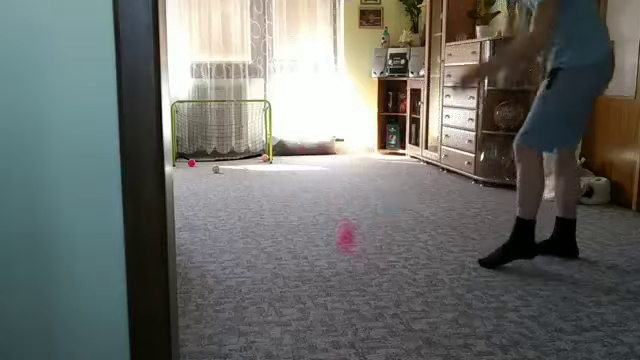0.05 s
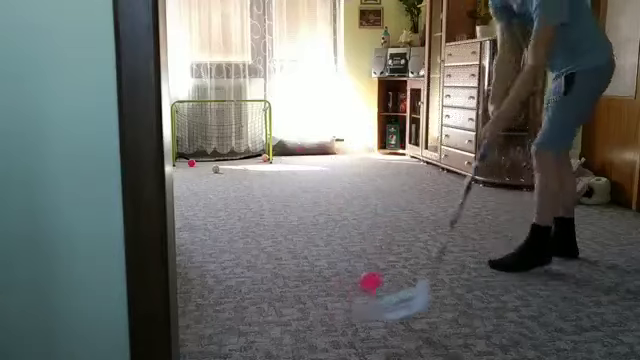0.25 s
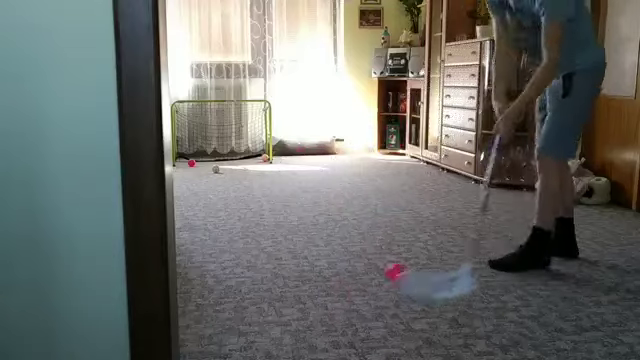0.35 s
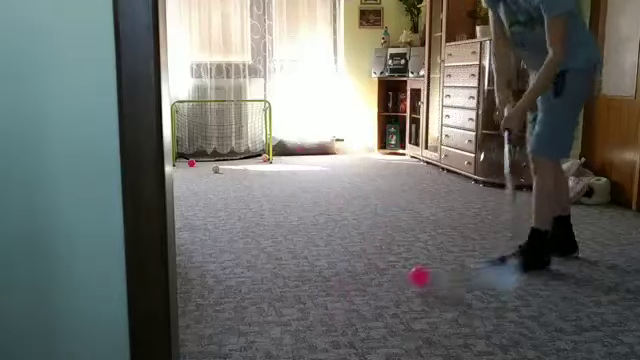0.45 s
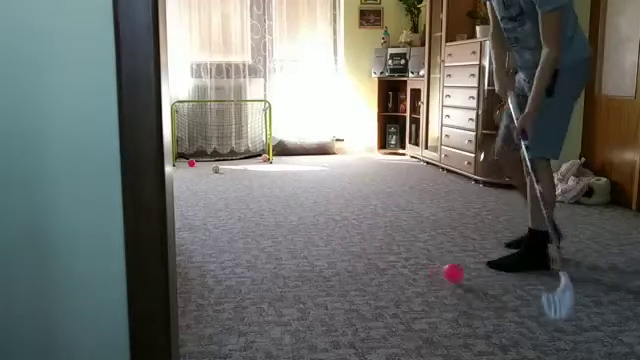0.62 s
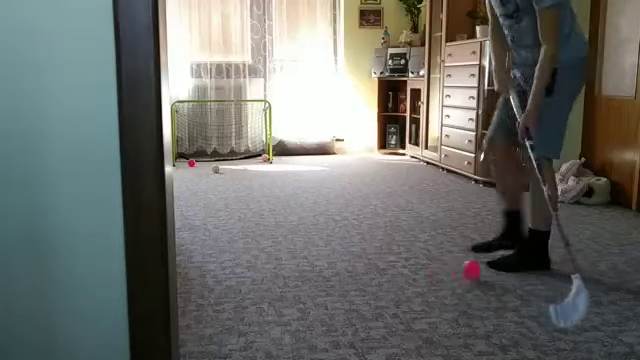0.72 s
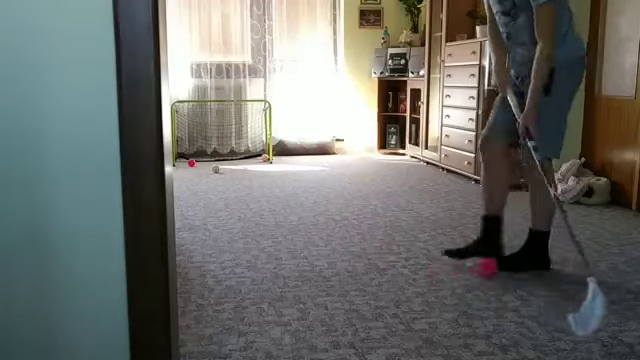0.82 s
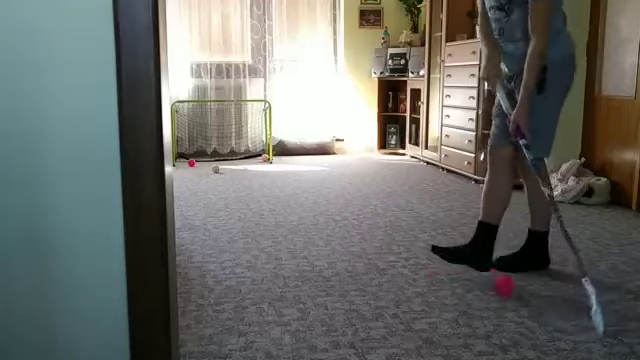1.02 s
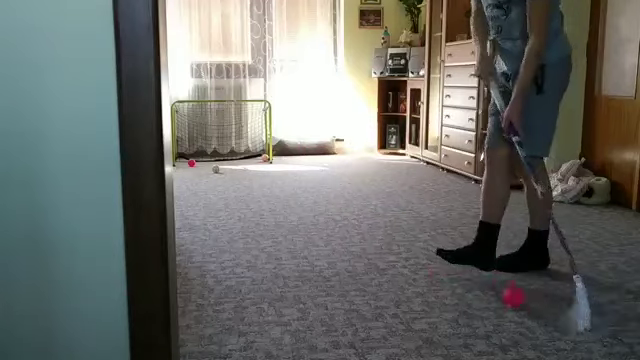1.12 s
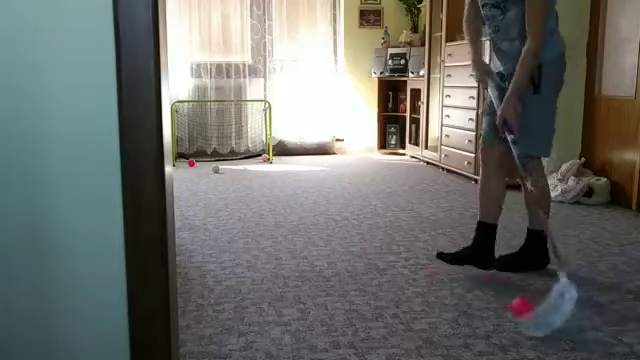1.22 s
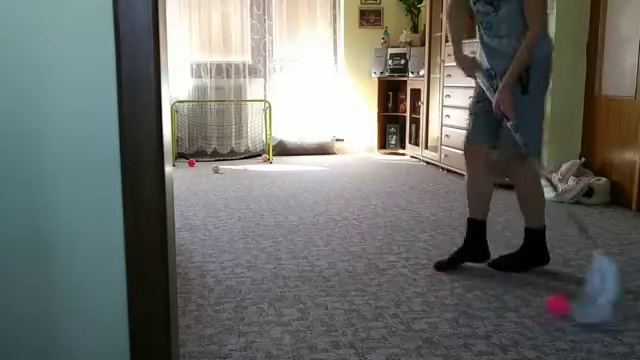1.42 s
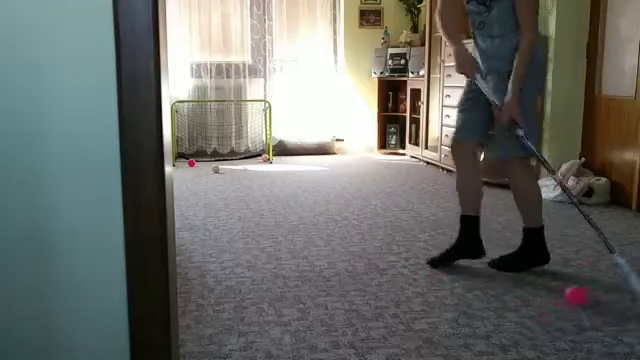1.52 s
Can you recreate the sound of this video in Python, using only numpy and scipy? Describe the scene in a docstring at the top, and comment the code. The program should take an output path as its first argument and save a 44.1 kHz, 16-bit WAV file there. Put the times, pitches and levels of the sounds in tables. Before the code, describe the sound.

One sharp stick hit on a plastic ball, then a lighter tap, in a quiet room.

```python
"""A quiet carpeted living room, with a floorball stick a few metres from the microphone.
The blade thuds on the carpet and cracks against the hollow plastic ball; later it taps the ball again.
Each blow is a click, a buzz, a short plastic ring and the note of the air inside the ball.
Around the blows the blade brushes the carpet and socked feet step softly, over a faint hiss."""
import sys
import numpy as np
from scipy import signal
from scipy.fft import rfft, irfft
from scipy.io import wavfile
from scipy.ndimage import uniform_filter1d

SR = 44100
rng = np.random.default_rng(int(sys.argv[2]) if len(sys.argv) > 2 else 0)


def store_wav(level_fs):
    """Save 16-bit WAV to argv[1]."""
    pcm = np.round(np.clip(np.atleast_2d(level_fs), -1, 1) * 32767)
    wavfile.write(sys.argv[1], SR, pcm.T.astype(np.int16))


N = 68355

# blade on ball, hard then light (time [s], click [dB], buzz [dB], shell [dB], echo hold [s], direct [dB])
BALL_HITS = [(.2612, 14.5, -1, 3, 0.024, -13.5), (1.3942, -4, -11, -8.5, 0.0018, -18.5)]
# EQ of the contact click (frequency [Hz], hard blow [dB], light blow [dB])
CLICK_EQ = [(29.6, -10, -24), (122, -31, -12), (236, -8, 0.5), (444, -0.5, -3.5), (1090, -7, 3),
            (1760, -5.5, -5), (3200, -3.5, -1.5), (3680, -2, -4), (5400, 2, -3.5), (8500, 3, 3),
            (11200, -4, -5.5), (13900, -10, -9), (16100, -13.5, -20)]
# ring of plastic shell and blade (frequency [Hz], hard blow [dB], light blow [dB], t60 [s])
SHELL_MODES = [(2430, -9, 3, .014), (3200, -2, -14, .05), (3530, -7, -8, .07), (4000, -6, -6, .05),
               (4340, 2, -9, .035), (4640, -6, -12, .05), (5520, 1, -16, .015), (5790, 1, -14, .018),
               (6000, 0, -9, .02), (6720, -7, -11, .035), (7600, -3, 0, .02), (8480, 1, -1, .016),
               (8950, -2, -3, .02), (9610, -2, 3, .018), (10850, -5, -14, .02), (11880, -8, -16, .06)]
# notches between the resonances (frequency [Hz], width [Hz], hard blow [dB], light blow [dB])
SHELL_NOTCHES = [(2750, 110, -8, 0), (3030, 130, -10, -2), (3400, 90, -5, 0), (3900, 100, -7, 0),
                 (4980, 170, -5, 0), (5280, 200, 0, -6), (6420, 260, -7, 0), (7000, 320, -6, -1),
                 (10400, 300, -3, -2), (12250, 240, -6, -1)]
# air note of the hollow ball, hard then light (pitch [Hz], level [dB])
AIR_NOTES = [(1128, -9), (1050, -15.5)]


def ball_blows():
    """A hard and a light blow: the blade clicks and buzzes on the ball; its shell and the air in it ring."""
    out, eqs, notches = np.zeros((2, N)), np.array(CLICK_EQ), np.array(SHELL_NOTCHES)
    buzz = blade_bending(unit(ring(hz=8200, t60=.002)))
    for k, (start, click_db, buzz_db, shell_db, hold_s, direct_db) in enumerate(BALL_HITS):
        contact = undb(click_db) * click(eqs[:, [0, k + 1]])
        shell = unit(sum(undb(mode[k + 1]) * ring(mode[0], mode[-1]) for mode in SHELL_MODES))
        clack = hollow(contact + undb(shell_db) * shell, notches[:, [0, 1, k + 2]])
        note_hz, note_db = AIR_NOTES[k]
        note = undb(note_db) * unit(ring(note_hz, t60=.13, size=8192))
        add(out, start, heard(blade_bending(clack), room(direct_db, pan_db=5, hold_s=hold_s)))
        add(out, start, heard(undb(buzz_db) * buzz, room(direct_db=-2, pan_db=5, hold_s=hold_s)))
        add(out, start, heard(note, room(direct_db=5, pan_db=-1)))
    return out


def blade_bending(sound, travel_s=.0006, at_hz=8000):
    """Bending waves cross the blade treble first and smear a click into a short crack."""
    hz = np.fft.rfftfreq(len(sound), 1 / SR)
    cycles = 2 * travel_s * np.sqrt(hz * at_hz)
    return irfft(rfft(sound) * np.exp(-2j * np.pi * cycles))


def hollow(sound, notches):
    """Narrow notches between the resonances make a blow sound hollow."""
    hz = np.fft.rfftfreq(len(sound), 1 / SR)
    cuts = [1 + (undb(db) - 1) / (1 + 2j * (hz - centre) / width) for centre, width, db in notches]
    return irfft(rfft(sound) * np.prod(cuts, axis=0))


# the blade lands and rebounds, then the ball bounces on the carpet (time [s], level [dB], echo hold [s])
FLOOR_HITS = [(0.2406, 2.6, 0.037), (.2490, -4, 0.039), (0.2887, -3, 0.004)]
# EQ of a knock on carpet (frequency [Hz], level [dB])
THUD_EQ = [(30, -35), (85, -11), (125, -16.5), (165, -13), (235, 2.5), (550, 2), (750, 1), (950, -6.5),
           (1500, -12), (2000, -17), (4000, -39.5), (9000, -34), (16000, -60)]
# low ring of the stick (frequency [Hz], level [dB], t60 [s])
STICK_MODES = [(250, 0, .07), (330, -3, .06), (505, -7, .05)]


def floor_thuds():
    """The blade knocks on the carpet twice in quick succession, the ball then bounces on it, and the stick
    rings low."""
    out = np.zeros((2, N))
    stick = unit(sum(undb(db) * ring(hz, t60) for hz, db, t60 in STICK_MODES))
    knock = click(THUD_EQ) + undb(-6) * stick
    for start, db, hold_s in FLOOR_HITS:
        add(out, start, heard(undb(db) * knock, room(direct_db=-3.5, hold_s=hold_s)))
    return out


# soft footfalls (time [s], bump level [dB], heel level [dB])
FOOTFALLS = [(0.016, -31, -46), (.11, -33.5, -30), (.218, -29.5, -21), (0.527, -19.5, -42),
             (0.696, -22, -25.5), (0.945, -25.5, -25), (1.272, -34, -30)]
# EQ of a sock landing on carpet (frequency [Hz], level [dB])
STEP_EQ = [(30, -12), (85, 3), (170, 6.5), (320, 8.5), (700, 3.5), (1400, -12), (4000, -13), (15000, -25)]
SOFT_DIRECT_DB = -11.5  # steps and brushing are mostly room sound


def footsteps():
    """Socked feet land with a dull bump and a low heel thump."""
    out, response = np.zeros((2, N)), room(SOFT_DIRECT_DB)
    heel = unit(ring(hz=85, t60=.052))
    for start, db, heel_db in FOOTFALLS:
        add(out, start, heard(undb(db) * click(STEP_EQ) + undb(heel_db) * heel, response))
    return out


# strokes on the carpet (time [s], attack [s], hold [s], release [s], level [dB], treble shelf [dB])
BRUSH_STROKES = [(-.02, 0.005, 0.0082, 0.15, -48.5, -1.5), (0.117, 0.041, 0.11, 0.014, -46, 2),
                 (0.464, 0.0071, 0.044, 0.28, -54, 1), (0.87, 0.0073, 0.029, 0.2, -54, 4.5),
                 (0.918, 0.0066, 0.034, 0.42, -60.5, -28), (1.262, 0.01, 0.25, 0.098, -63.5, 9.5),
                 (1.479, 0.0079, 0.017, 0.056, -45, -7.5)]
# EQ of the brushed fibres (frequency [Hz], level [dB])
BRUSH_EQ = [(100, 8), (400, 4), (1300, 2), (2300, 6), (2900, 2.5), (4500, 1), (6000, 2.5), (9000, 6),
            (12000, 0), (15000, -7.5), (16500, 5)]


def brushing(grain_db=8.5, shelf_hz=3300):
    """Carpet fibres flick under blade and socks in short grainy strokes, some bright, some dull."""
    t, strokes = np.arange(N) / SR, 0
    fibres = unit(rng.standard_normal(N) * undb(grain_db * rng.standard_normal(N))) * np.sqrt(N)
    dull = signal.sosfilt(signal.butter(1, shelf_hz, fs=SR, output="sos"), fibres)
    for start, attack, hold, release, db, treble_db in BRUSH_STROKES:
        pressure = np.interp(t, start + np.cumsum([0, attack, hold, release]), [0, 1, 1, 0])
        strokes = strokes + undb(db) * pressure * (dull + undb(treble_db) * (fibres - dull))
    return heard(signal.fftconvolve(strokes, click(BRUSH_EQ)), room(SOFT_DIRECT_DB))[:, :N]


# reverb time of the living room (frequency [Hz], t60 [s])
ROOM_DECAY = [(80, 1), (250, 0.45), (700, 0.49), (2000, 0.45), (5000, 0.33), (9000, 0.28), (14000, 0.19)]
# treble beams straight to the microphone while furniture soaks up its echoes (frequency [Hz], level [dB])
DIRECT_EQ = [(200, -1), (1500, -2), (4500, -2.5), (8500, -2), (14000, 6)]


def room(direct_db, pan_db=0, hold_s=.0059, size=32768):
    """Response from one spot: the direct sound, then echoes that thicken, hold and fade, treble first."""
    t, hz = np.arange(size) / SR, np.fft.rfftfreq(size, 1 / SR)
    scatter_db, mixing_s, build_s = 10.5, .024, .00053
    # spiky early echoes melt into a smooth wash
    scatter = undb(scatter_db * np.exp(-t / mixing_s) * rng.standard_normal((2, size)))
    echoes = rng.standard_normal((2, size)) * scatter
    levelled = echoes / np.sqrt(uniform_filter1d(echoes ** 2, size=400))
    spectrum = rfft(stereo_pair(levelled, alike_hz=766))
    centres, tail = np.geomspace(50, 16000, 16), 0
    fading_s = np.maximum(t - hold_s, 0)
    for centre, weights in zip(centres, np.eye(len(centres))):
        band = irfft(spectrum * over_hz(hz, np.c_[centres, weights]))
        tail = tail + band * np.exp(-np.log(1000) * fading_s / over_hz(centre, ROOM_DECAY))
    response = unit(tail * (1 - np.exp(-t / build_s))) * pan(-1.5)
    direct = click(DIRECT_EQ)
    response[:, :len(direct)] += direct * undb(direct_db) * pan(pan_db)
    return response


# early reflections off the door frame and wall beside the microphone (delay [s], level [dB])
DOORWAY_ECHOES = [(.0021, -19), (.0036, -9), (.0083, -9)]


def doorway(sound, above_hz=2800, size=131072):
    """Near surfaces mirror the treble and comb it to a slightly hollow colour."""
    hz = np.fft.rfftfreq(size, 1 / SR)
    mirrored = hz ** 2 / (hz ** 2 + above_hz ** 2)
    comb = 1 + mirrored * sum(undb(db) * np.exp(-2j * np.pi * hz * delay) for delay, db in DOORWAY_ECHOES)
    power = 1 + mirrored ** 2 * sum(undb(db) ** 2 for _, db in DOORWAY_ECHOES)
    return irfft(rfft(sound, size) * comb / np.sqrt(power))[:, :N]


# EQ of the noise bed (frequency [Hz], level [dB])
HISS_EQ = [(25, 9.5), (40, -16), (90, 5.5), (160, -3.5), (350, 1.5), (600, -4.5), (1300, -9.5),
           (2000, -15.5), (3600, -14.5), (4400, -6.5), (5400, -17), (8000, -14), (11200, -11),
           (15000, -22.5)]


def hiss(rms_db=-58):
    """Steady room tone and microphone hiss."""
    spectrum = rfft(stereo_pair(rng.standard_normal((2, N)), alike_hz=790))
    bed = irfft(spectrum * undb(over_hz(np.fft.rfftfreq(N, 1 / SR), HISS_EQ)), N)
    return unit(bed) * np.sqrt(2 * N) * undb(rms_db)


def undb(db):
    """Decibels to gain."""
    return 10 ** (np.asarray(db) / 20)


def unit(x):
    """Scale to an energy of one."""
    return x / np.sqrt(np.sum(x ** 2))


def pan(db):
    """Stereo gains with the left side db above the right."""
    return undb([[db / 2], [-db / 2]])


def over_hz(hz, points):
    """Read (frequency [Hz], value) points on a log-frequency axis."""
    points = np.array(points)
    return np.interp(np.log(hz + 1), np.log(points[:, 0]), points[:, 1])


def click(eq, size=4096):
    """The tightest transient with the given EQ: a minimum-phase pulse."""
    cepstrum = irfft(np.log(undb(over_hz(np.fft.rfftfreq(size, 1 / SR), eq))))
    cepstrum[1:size // 2] *= 2
    cepstrum[size // 2 + 1:] = 0
    return unit(irfft(np.exp(rfft(cepstrum))))


def ring(hz, t60, size=4096):
    """One mode, fading by 60 dB in t60 seconds."""
    t = np.arange(size) / SR
    return np.cos(2 * np.pi * hz * t) * np.exp(-np.log(1000) * t / t60)


def stereo_pair(noise, alike_hz):
    """Two unrelated noises as left and right: near mono in the bass, wide in the treble."""
    hz = np.fft.rfftfreq(noise.shape[1], 1 / SR)
    alike = 0.87 / (1 + (hz / alike_hz) ** 2)
    mid, side = rfft(noise) * np.sqrt([1 + alike, 1 - alike])
    return irfft(np.array([mid + side, mid - side]), noise.shape[1]) / np.sqrt(2)


def heard(sound, response):
    """A mono sound carried through the room to left and right."""
    return signal.fftconvolve(sound[None], response, axes=1)


def add(out, start_s, sound):
    """Mix a stereo sound in at its time."""
    i = int(np.clip(start_s * SR, 0, N - 1))
    out[:, i:i + sound.shape[1]] += sound[:, :N - i]


def scene():
    """Stick, ball and feet heard from the doorway, over the noise bed."""
    return doorway(ball_blows() + floor_thuds() + footsteps() + brushing()) + hiss()


def record(dry, top_hz=15400):
    """A steep low-pass takes off the very top."""
    return signal.sosfilt(signal.ellip(8, .2, 70, top_hz, fs=SR, output="sos"), dry)


dry = scene()
out = record(dry)
store_wav(out)
```